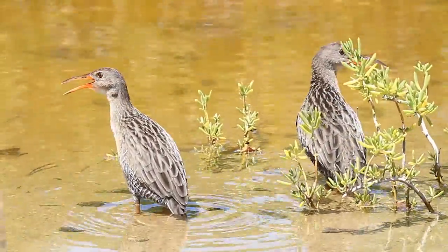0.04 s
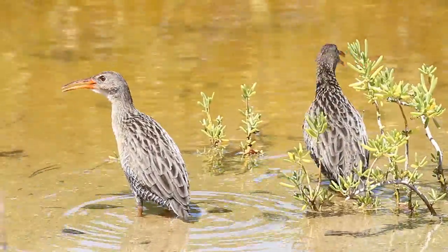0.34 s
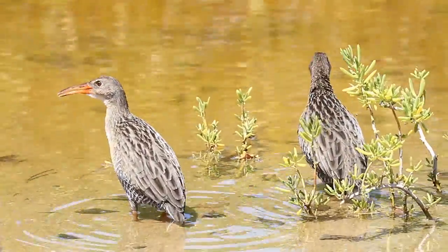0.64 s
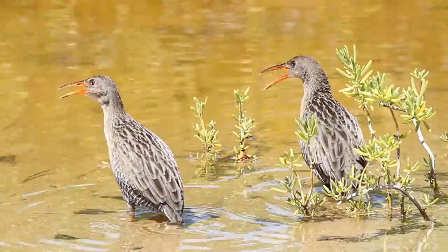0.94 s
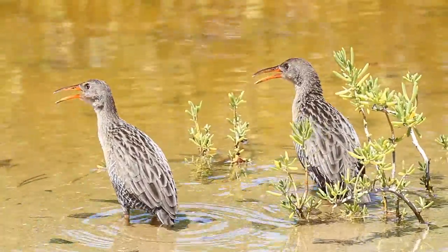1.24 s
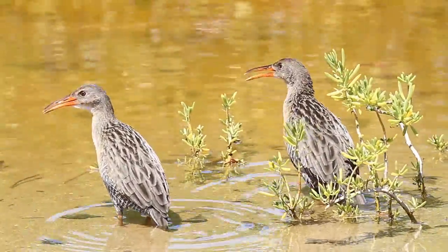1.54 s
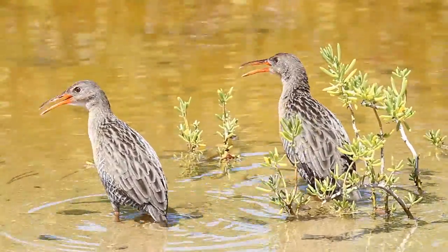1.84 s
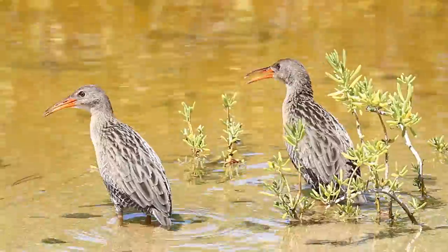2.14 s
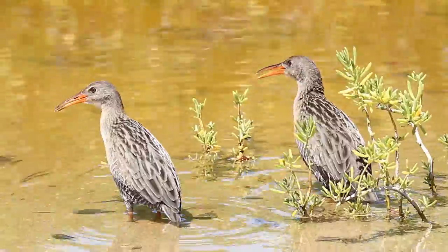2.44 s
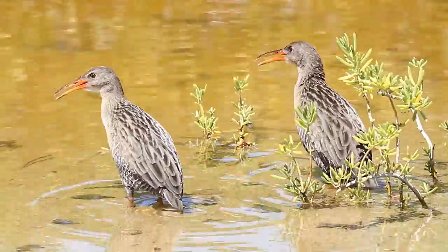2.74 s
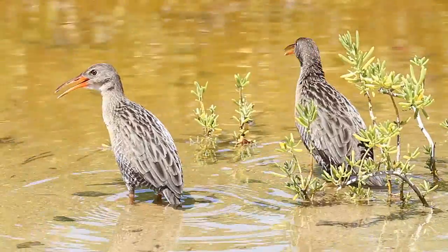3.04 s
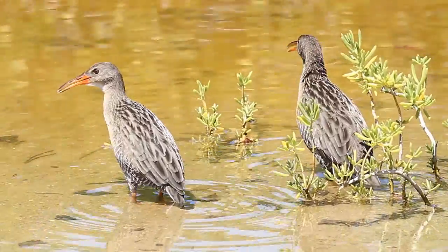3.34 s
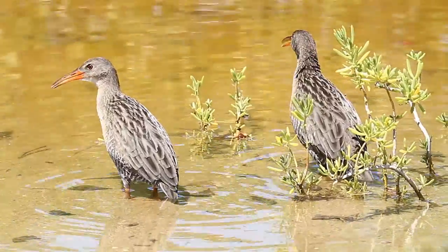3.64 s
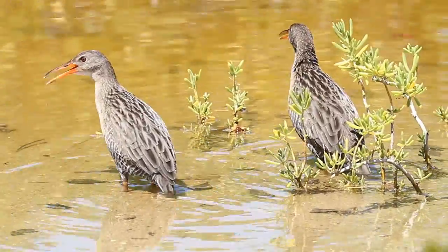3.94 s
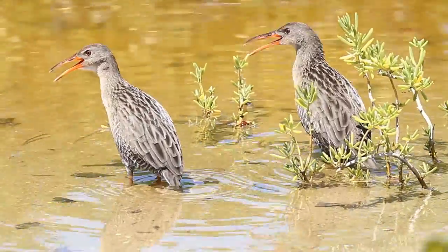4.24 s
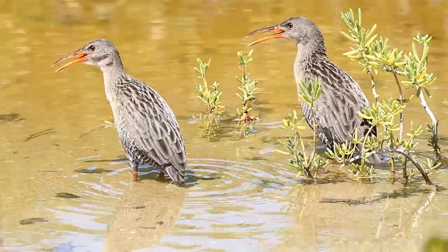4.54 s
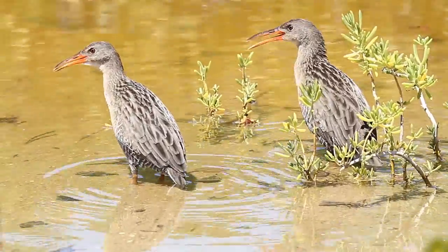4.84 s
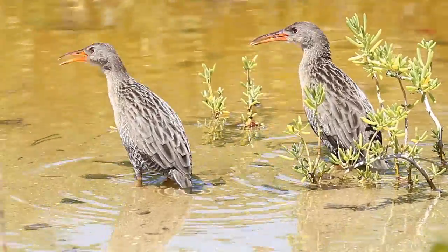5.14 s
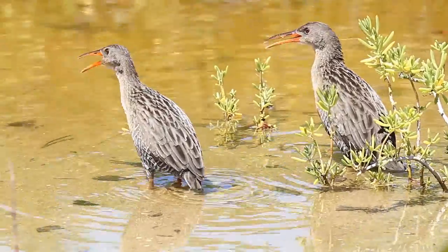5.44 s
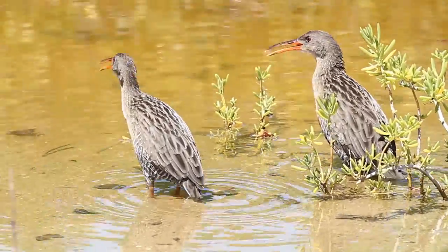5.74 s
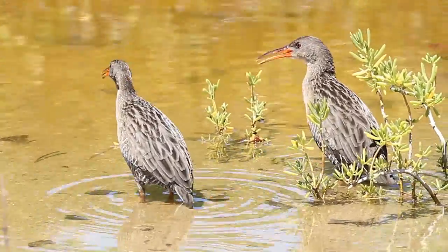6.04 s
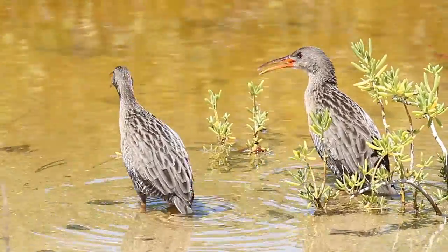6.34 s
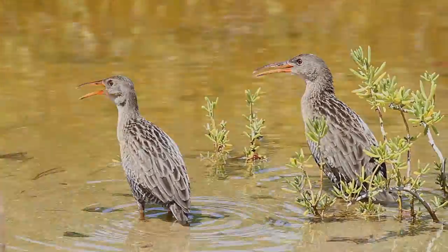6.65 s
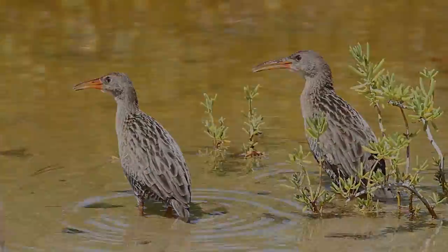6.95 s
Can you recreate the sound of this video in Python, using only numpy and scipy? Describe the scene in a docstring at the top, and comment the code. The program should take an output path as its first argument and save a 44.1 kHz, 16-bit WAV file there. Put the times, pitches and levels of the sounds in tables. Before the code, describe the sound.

Marsh birds repeat sharp, raspy notes about four times a second, mixed with lower grunts and a few low wind bumps.

```python
"""Long hoarse grunts, dry falling keks and shrill yelps: two rails call together in a mangrove shallow.
Unevenly beating membranes and rasping air make each note, throat and bill colour it, and the shallows
and bushes scatter it back. Puffs of wind thump on a mono microphone over a faint hush and a thin high
whine, with two far-off chirps and a few dry ticks."""
import sys
import numpy as np
from scipy import signal
from scipy.fft import next_fast_len
from scipy.io import wavfile

SR = 44100
rng = np.random.default_rng(int(sys.argv[2]) if len(sys.argv) > 2 else 0)


def digitize_waveform(pressure):
    """Quantize a signal to 16-bit integers and store it at the path in sys.argv[1].

    Rows of a 2-D input are taken as channels; values are limited to [-1, 1].
    """
    field = np.atleast_2d(pressure).T
    bounded = np.clip(field, -1, 1)
    quanta = np.round(bounded * 32767).astype(np.int16)
    wavfile.write(sys.argv[1], SR, quanta)


N = 309141
TIME = np.arange(N) / SR

# the breeze rising and easing: t/s, relative level/dB
BREEZE = [(0.0, -55), (0.35, -51.5), (0.6, -54.5), (1.38, -52.5), (1.73, -55), (2.26, -52.5), (2.49, -58),
          (3.39, -51.5), (3.7, -59), (5.09, -60.5), (6.14, -57.5), (7.0, -62.5)]


def gain_of(db):
    """Decibels to amplitude."""
    return 10 ** (np.asarray(db) / 20)


def unit_rms(x):
    """Scales to rms 1."""
    return x / np.sqrt(np.mean(x ** 2) + 1e-20)


def curve_at(points, hz):
    """Reads a curve on a log-frequency axis."""
    f, value = np.transpose(points)
    return np.interp(np.log(hz + 1), np.log(f + 1), value)


def add(mix, s, sound):
    """Mixes a sound in at time s; it may have begun before time zero."""
    at = round(s * SR)
    sound = sound[max(-at, 0):]
    part = mix[max(at, 0):][:len(sound)]
    part += sound[:len(part)]


def coloured(x, spectrum, tilt_db=0):
    """Minimum-phase EQ whose peaks ring on, tilted by tilt_db an octave in the highs."""
    size = next_fast_len(len(x) + 2048)
    hz = abs(np.fft.fftfreq(size, 1 / SR))
    log_gain = np.log(gain_of(curve_at(spectrum, hz) + tilt_db * np.log2(hz / SR + 1e-2)))
    response = np.exp(np.conj(signal.hilbert(log_gain)))
    return np.fft.ifft(np.fft.fft(x, size) * response).real[:len(x)]


def white(count):
    """Up to a second of white noise."""
    return rng.standard_normal(SR)[:count]


def wobble(count, hz):
    """Random motion of rms 1, rolled off above hz."""
    return unit_rms(signal.sosfilt(signal.butter(2, hz, fs=SR, output="sos"), white(count)))


def syrinx(hz, rough, jitter, jitter_hz, subharmonic, rolloff_hz, rattle, rattle_hz):
    """Membranes beat unevenly, strong and weak by turns; the air they chop adds a rattling rasp."""
    count, rough = len(hz), np.clip(rough, .15, .95)
    phase = 2 * np.pi * np.cumsum(hz * (1 + jitter * rough * wobble(count, jitter_hz))) / SR
    k = np.arange(1, 12)[:, None]
    harmonics = np.cos(k * phase + 2 * np.pi * rng.random(k.shape))
    tone = (harmonics / np.hypot(1, (k * hz / rolloff_hz) ** 2)).sum(0)
    tone *= 1 + subharmonic * rough * np.cos(phase / 2 + wobble(count, jitter_hz))
    rasp = white(count) * (1 + 0.76 * np.cos(phase))
    flutter = np.exp(rattle * rough * wobble(count, rattle_hz))
    return flutter * (np.sqrt(1 - rough ** 2) * unit_rms(tone) + 2 * rough ** 2 * unit_rms(rasp))


def grunts():
    """Long hoarse notes: pitch and level sink ever faster, and the rasp clears as the pitch falls."""
    # grunts: t/s, length/s, relative level/dB, top f/Hz, end f/Hz, scoop from below/Hz
    calls = [(-0.08, 0.41, -35, 827, 506, 1), (1.044, .42, -34.5, 775, 541.5, -1),
             (2.864, 0.43, -36.5, 685, 501.4, 114.5), (4.176, 0.46, -32.5, 782.6, 534.6, 0),
             (5.443, .42, -35, 787.6, 561.5, 0.5), (6.468, 0.37, -34, 849, 524.4, 84.5)]
    # throat and bill resonances: f/Hz, level/dB
    throat = [(430, -30), (700, -13), (950, -15.5), (1400, -15.5), (1800, 0), (2300, -5), (3400, -13),
              (4250, 3.5), (5100, -9), (6400, 1), (7050, -21.5), (8500, -19), (9300, -24.5), (12000, -16),
              (15500, -32)]
    scoop_s, attack_s, release_s, fade_db = .07, 0.013, 0.036, -8.5
    out = np.zeros(N)
    for s, length, db, top_hz, end_hz, scoop_hz in calls:
        t = np.arange(0, length, 1 / SR)
        spent = t / length
        hz = top_hz + (end_hz - top_hz) * spent ** 1.5 - scoop_hz * np.exp(-t / scoop_s)
        hz *= 1 + .012 * wobble(len(t), hz=18)
        rough = 0.666 + 0.59 * np.log2(hz / 698)
        gate = np.minimum(t / attack_s, 1) * np.minimum((length - t) / release_s, 1)
        level = gain_of(db + fade_db * spent ** 2.34) * gate
        buzz = syrinx(hz, rough, jitter=.055, jitter_hz=294, subharmonic=1.1, rolloff_hz=2180,
                      rattle=0.11, rattle_hz=200)
        add(out, s, level * unit_rms(coloured(buzz, throat)))
    return out


def short_notes(calls, throat, attack_s, hold_s, fade_s, drop, drop_s, open_rough, rough_per_opening,
                harsh_start, jitter, rolloff_hz, tilt_db, treble_per_opening_db):
    """A harsh burst of pressure that sinks in pitch and level. A wider bill is harsher and brighter."""
    out, t = np.zeros(N), TIME[:SR // 10]
    pressure = (1 - np.exp(-(t / attack_s) ** 2)) * np.exp(-np.maximum(t - hold_s, 0) / fade_s)
    glide = 1 - drop * (1 - np.exp(-(t / drop_s) ** 2))
    throat_hz, throat_db = np.transpose(throat)
    treble = np.clip(np.log2(throat_hz / 6500), 0, 1)  # these highs escape only as the bill opens
    for s, db, ring_hz, opening in calls:
        rough = open_rough + rough_per_opening * (opening - 1)
        harsh = rough * (1 + harsh_start * np.exp(-t / .008))
        buzz = syrinx(ring_hz / 4 * glide, harsh, jitter=jitter, jitter_hz=600, subharmonic=1.,
                      rolloff_hz=rolloff_hz, rattle=.22, rattle_hz=400)
        bill_db = throat_db + treble_per_opening_db * (opening - 1) * treble
        bill = np.transpose([throat_hz * opening, bill_db])
        voice = coloured(buzz * pressure, bill, tilt_db)
        add(out, s - .002, gain_of(db) * unit_rms(voice) * np.sqrt(np.mean(pressure ** 2)))
    return out


def keks():
    """Dry, quickly falling notes; the throat rings on their fourth harmonic."""
    # keks: t/s, relative level/dB, fourth harmonic at onset f/Hz, bill opening (1 = wide)
    calls = [(-0.018, -9, 4400, .99), (0.193, -11.5, 4404, 1), (0.404, -12.5, 4400, 0.96),
             (0.6124, -12.3, 4202, 0.97), (1.0053, -11.5, 4640, 1), (1.046, -12.5, 4600, 0.99),
             (1.2728, -12.5, 4350, 0.99), (1.48, -12.5, 4237, .99), (1.694, -12, 4607, 0.99),
             (1.9216, -14, 4140, 0.98), (2.1565, -13.5, 4442, .98), (2.445, -13.5, 4280, .98),
             (2.7657, -13, 4157, .99), (3.0128, -12.5, 4200, .99), (3.2665, -13.5, 4274, 0.96),
             (3.5256, -14, 4500, 0.96), (3.8037, -14.5, 4403, .96), (4.119, -13, 4240, 0.95),
             (4.3657, -10.5, 4580, 1), (4.6222, -12.3, 4070, 0.99), (4.9584, -14.5, 4050, 0.97),
             (5.4472, -13, 4480, 0.99), (5.7306, -13, 4260, 0.98), (6.025, -13, 4227, 0.98),
             (6.3362, -12, 4415, 0.99), (6.5972, -12.5, 4295, 1), (6.8563, -12, 4500, 1)]
    # throat resonances, bill wide: f/Hz, level before tilt/dB
    throat = [(450, -19), (750, -12), (1300, -15), (1900, -2), (2450, -16.5), (3100, -4), (3600, -13.5),
              (4250, 3.5), (5000, -7), (5800, -2.5), (6600, -10.5), (7200, -21.5), (12000, -19.5),
              (15500, -43)]
    return short_notes(calls, throat, attack_s=0.0032, hold_s=0.014, fade_s=.023, drop=.31, drop_s=.03,
                       open_rough=0.55, rough_per_opening=2.56, harsh_start=0.8, jitter=0.0934,
                       rolloff_hz=4650, tilt_db=3.0, treble_per_opening_db=140)


def reflections(x, delay_s, fade_s):
    """Water, mud and plants in the shallows return a quick cluster of reflections after a delay."""
    t = TIME[:SR // 10]
    taps = np.sign(white(len(t))) * (rng.random(len(t)) < 2500 / SR)
    taps *= (t > delay_s) * np.exp(-t / fade_s)
    return signal.oaconvolve(x, taps / np.linalg.norm(taps))[:N]


def bushes(x, build_s):
    """Many small echoes from leaves and stems build up, then die band by band."""
    # decay in the bushes: f/Hz, t60/s
    decay_times = [(500, 0.45), (1800, 0.17), (3200, 0.22), (6000, 0.1753), (12000, 0.12)]
    # colour of their echo: f/Hz, relative level/dB
    colour = [(500, -19), (1800, -6), (2500, -3.5), (3200, -1), (4300, -14), (6300, -12), (8500, -6),
              (13000, -3.5)]
    count = SR // 2
    taps = white(count) * (rng.random(count) < 3000 / SR)
    hz, t, bands = signal.stft(taps, SR, nperseg=256)
    decay = gain_of(-60 * t / curve_at(decay_times, hz)[:, None]) * (1 - np.exp(-(t / build_s) ** 2))
    decay *= gain_of(curve_at(colour, hz))[:, None] / np.sqrt((decay ** 2).mean(1, keepdims=True))
    tail = signal.istft(bands * decay, SR, nperseg=256)[1] / np.linalg.norm(taps)
    return signal.fftconvolve(x, tail)[:N]


def leaf_slap(x):
    """Small leaves return a late slap, mostly treble."""
    # colour of the slap: f/Hz, relative level/dB
    colour = [(500, -14), (5000, -31.5), (8000, 10.5), (12000, -37), (15000, 4)]
    return coloured(reflections(x, delay_s=0.028, fade_s=0.01), colour)


def small_puffs(per_s, centre_hz, lift_db, spread_db):
    """Weak puffs at random moments, riding on the breeze: rows of t/s, level/dB, f/Hz."""
    puffs = []
    for when, size, pitch in rng.random((round(per_s * N / SR), 3)):
        s = when * N / SR
        db = np.interp(s, *np.transpose(BREEZE)) + lift_db + spread_db * (2 * size - 1)
        puffs.append((s, db, centre_hz * 2 ** (pitch - .5)))
    return puffs


def wind(rumble_db, lumps_db, wake_db):
    """A lumpy rumble; each puff shoves the diaphragm for a cycle or two and leaves a short wake."""
    # strong puffs on the microphone: peak t/s, level/dB, f/Hz
    thumps = [(0.497, -33, 138), (0.617, -34, 143), (0.897, -32.5, 137), (1.154, -32, 116),
              (1.374, -19.5, 115), (1.392, -19, 204), (1.396, -21.5, 700), (1.439, -29, 114),
              (1.454, -25, 137), (2.034, -36, 113), (3.004, -34, 129), (3.128, -27.5, 133),
              (3.325, -18.5, 174), (3.346, -28, 108), (3.44, -27.5, 174), (3.51, -36, 125),
              (4.027, -24, 135), (4.743, -37, 118), (6.155, -35.5, 128), (6.715, -23.5, 134)]
    # colour of the eddies: f/Hz, relative level/dB
    rumble = [(20, -37), (55, 7), (110, 1.5), (220, -2), (400, -6.5), (800, -69), (2000, -45)]
    half_width_cycles, wake_s = 0.63, 0.011
    lumps = unit_rms(coloured(rng.standard_normal(N), [(1, 8.0), (14, 10), (40, -42), (100, -57)]))
    eddies = unit_rms(coloured(rng.standard_normal(N), rumble))
    shoves, wake = np.zeros(N), np.zeros(N)
    t = TIME[:SR // 5]
    from_peak = t - .1
    for s, db, hz in thumps + small_puffs(per_s=6, centre_hz=152, lift_db=10, spread_db=1.5):
        swell = gain_of(db) * np.exp(-(from_peak * hz / half_width_cycles) ** 2)
        add(shoves, s - .1, swell * np.cos(2 * np.pi * (hz * from_peak + rng.random())))
        add(wake, s, gain_of(db + wake_db) * np.exp(-t / wake_s))
    breeze = gain_of(np.interp(TIME, *np.transpose(BREEZE)) + rumble_db + lumps_db * lumps)
    return shoves + eddies * (wake + breeze)


def hush_and_whine(hush_db, whine_db, whine_hz):
    """The hush of the shore and a thin electronic whine."""
    # colour of the hush: f/Hz, relative level/dB
    colour = [(30, -1.5), (300, 2), (700, -1), (1700, 3), (2500, -4), (4500, -7.5), (6500, -14),
              (7500, -15.5), (14000, -19), (15600, -9)]
    hush = unit_rms(coloured(rng.standard_normal(N), colour))
    return gain_of(hush_db) * hush + gain_of(whine_db) * np.sin(2 * np.pi * whine_hz * TIME)


def yelps():
    """Shrill notes, raspier than the keks, held longer and falling more slowly."""
    # yelps: t/s, relative level/dB, fourth harmonic at onset f/Hz, bill opening (1 = wide)
    calls = [(0.8202, -16.5, 4795, 0.9), (1.8876, -19.5, 4806, 0.94), (2.7047, -17.5, 4817, 0.98),
             (4.0125, -18, 4827, 0.96), (5.1726, -19, 4607, 0.94), (5.3462, -20, 4720, 0.915),
             (6.2194, -19.5, 4503, 0.94), (6.3885, -21, 4770, 0.93)]
    # throat resonances, bill wide: f/Hz, level before tilt/dB
    throat = [(150, -42), (300, -12.5), (500, -37), (850, -8.5), (1400, -20.5), (2100, -7.5), (2950, -16),
              (3600, -1.5), (4050, -11), (4750, 4), (5500, -12.5), (6450, 0.5), (7500, -16), (9500, -26.5),
              (11500, -14.5), (15500, -30)]
    return short_notes(calls, throat, attack_s=0.0042, hold_s=0.02, fade_s=0.017, drop=.26, drop_s=.046,
                       open_rough=0.758, rough_per_opening=0.57, harsh_start=.4, jitter=0.0685,
                       rolloff_hz=7160, tilt_db=1.7, treble_per_opening_db=50)


def chirps():
    """Thin falling whistles from a small bird far off."""
    # whistles: t/s, level/dB, start f/Hz, end f/Hz, length/s
    calls = [(1.587, -62, 8340, 7650, 0.034), (4.805, -59.5, 8850, 7160, 0.024)]
    out = np.zeros(N)
    for s, db, from_hz, to_hz, length in calls:
        hz = np.linspace(from_hz, to_hz, int(length * SR))
        add(out, s, gain_of(db) * np.hanning(len(hz)) * np.sin(2 * np.pi * np.cumsum(hz) / SR))
    return out


def ticks(fade_s):
    """Faint dry snaps of noise."""
    # snaps: t/s, level/dB
    snaps = [(2.615, -44), (3.468, -52), (5.942, -53), (5.989, -57)]
    # their colour: f/Hz, relative level/dB
    colour = [(1000, -25), (4000, -3), (6000, -2), (9000, -11), (15000, -16)]
    out, t = np.zeros(N), TIME[:SR // 50]
    for s, db in snaps:
        add(out, s, gain_of(db) * unit_rms(coloured(white(len(t)), colour)) * np.exp(-t / fade_s))
    return out


def scene():
    """The birds and their echoes over ticks, hush, whine and wind, alike in both channels."""
    birds = gain_of(-11.5) * keks() + gain_of(-2) * yelps() + gain_of(2.5) * grunts() + chirps()
    echoes = gain_of(-11.5) * reflections(birds, delay_s=0.0022, fade_s=0.017)
    echoes += gain_of(-5.0) * leaf_slap(birds)
    echoes += gain_of(1.5) * bushes(birds, build_s=0.012)
    mono = birds + echoes + ticks(fade_s=.002)
    mono += hush_and_whine(hush_db=-54, whine_db=-58.0, whine_hz=15613)
    mono += wind(rumble_db=1.06, lumps_db=5.0, wake_db=-11.0)
    return np.array([mono, mono])


def record(dry):
    """A steep low-pass shaves off the very top, just above the whine."""
    low_pass = signal.firwin(801, 15800, window=("kaiser", 9), fs=SR)
    return signal.oaconvolve(dry, low_pass[None], "same", axes=1)


dry = scene()
out = record(dry)
digitize_waveform(out)
```